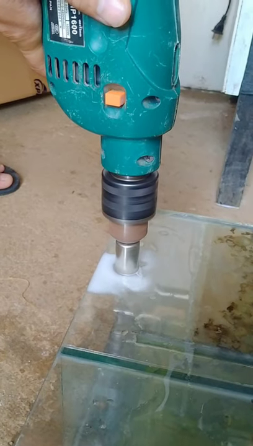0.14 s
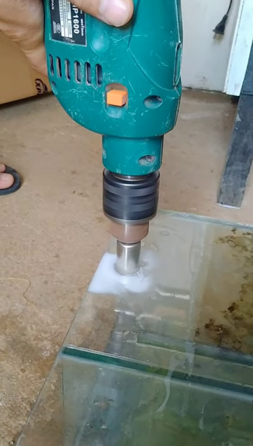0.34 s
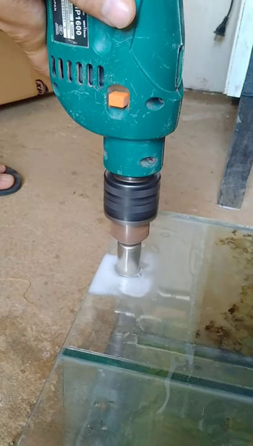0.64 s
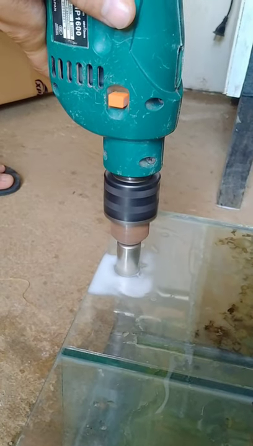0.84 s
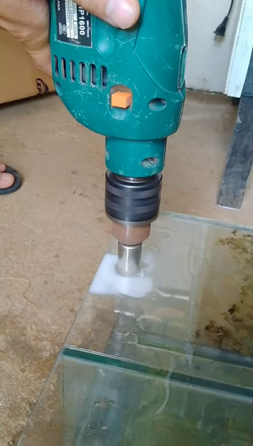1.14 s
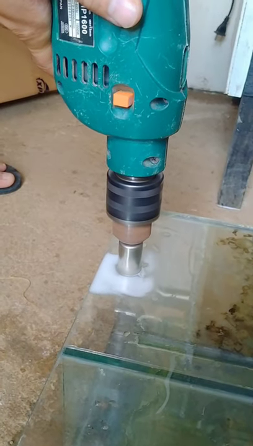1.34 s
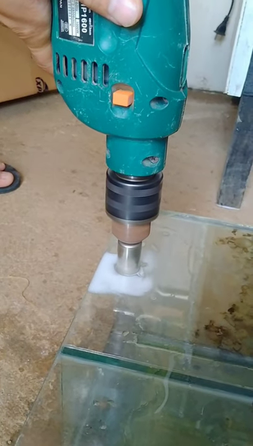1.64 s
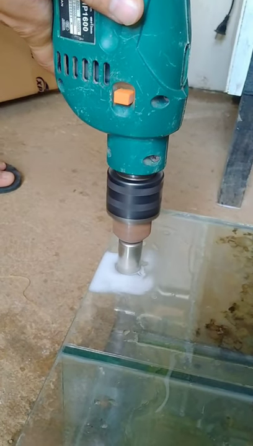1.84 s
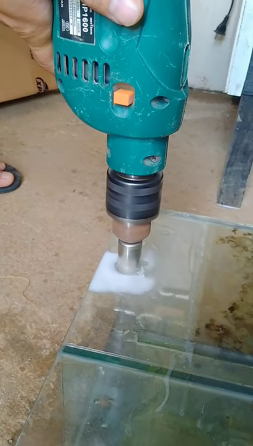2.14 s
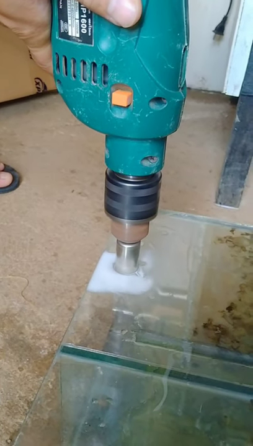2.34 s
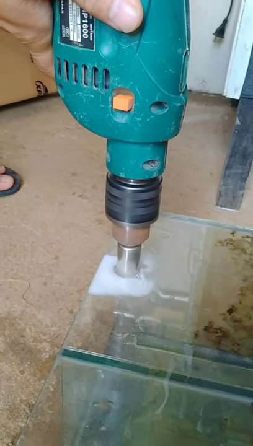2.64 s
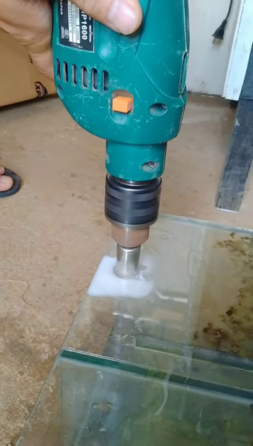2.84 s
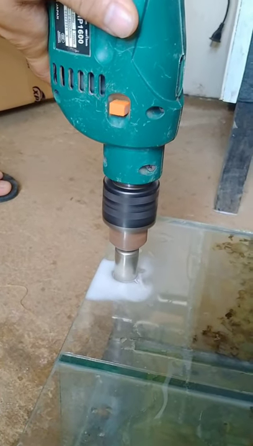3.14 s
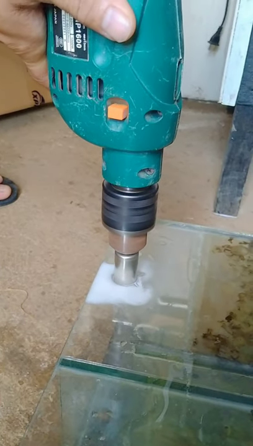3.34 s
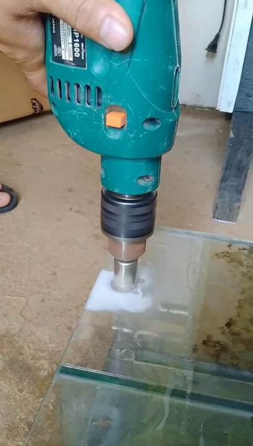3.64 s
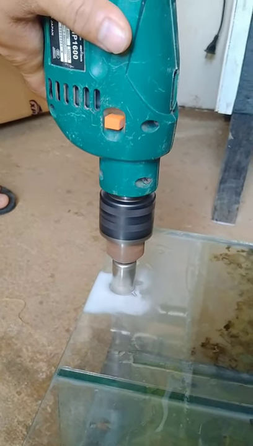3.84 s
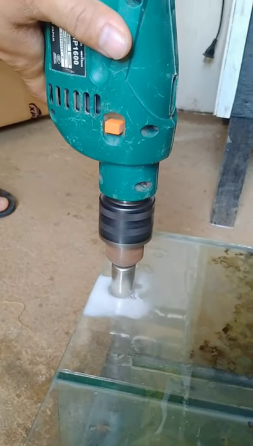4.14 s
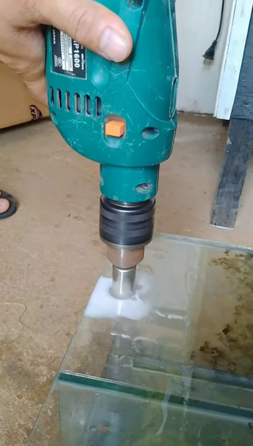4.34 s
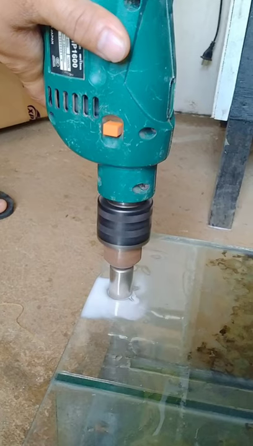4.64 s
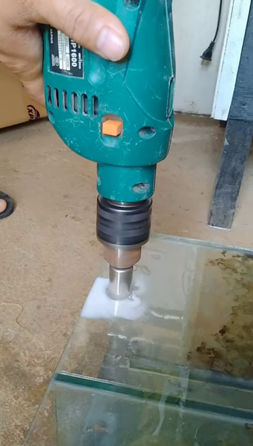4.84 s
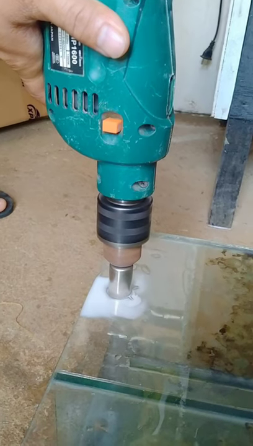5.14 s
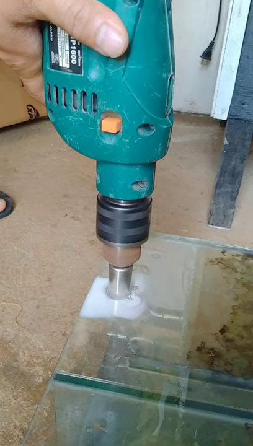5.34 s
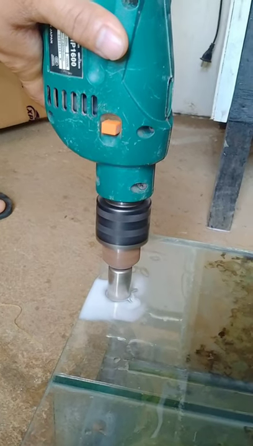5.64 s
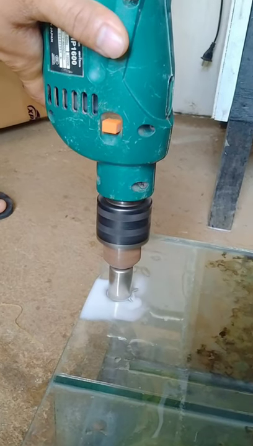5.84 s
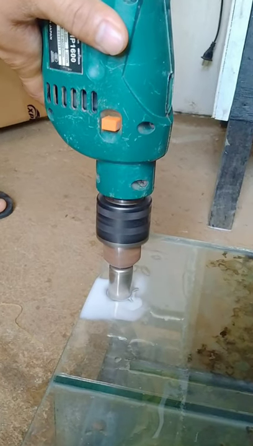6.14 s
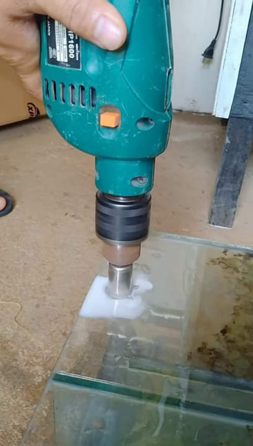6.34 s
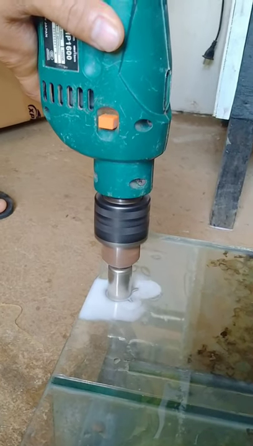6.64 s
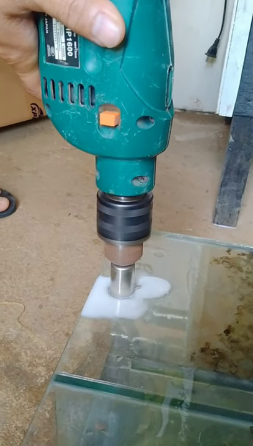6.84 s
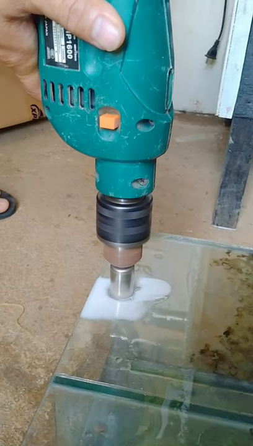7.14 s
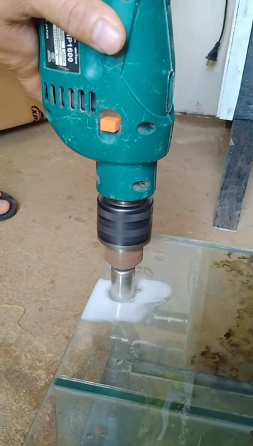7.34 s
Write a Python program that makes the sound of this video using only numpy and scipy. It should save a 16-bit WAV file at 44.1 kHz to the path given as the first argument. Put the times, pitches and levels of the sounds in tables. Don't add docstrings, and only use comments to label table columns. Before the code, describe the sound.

An electric drill grinds a core bit through a wet glass tank, very close to a phone microphone. The motor sags in the first half second, recovers, then holds steady. A rough, rapidly fluttering squeal dominates, first mixed, then mostly high and piercing, later dropping to a lower, hollower screech. Grit scrapes, the tank rumbles faintly and slurry fizzes; the sound is dense and squashed by limiting.

```python
import sys
import numpy as np
from scipy import signal
from scipy.fft import rfft, irfft, next_fast_len
from scipy.io import wavfile
from scipy.ndimage import uniform_filter1d, minimum_filter1d, map_coordinates

SR = 44100
rng = np.random.default_rng(int(sys.argv[2]) if len(sys.argv) > 2 else 0)


def nominal_scale(level):
    x = np.asarray(level, float) / 20
    return 10 ** x


def digitize_waveform(pressure):
    field = np.atleast_2d(pressure).T
    bounded = np.clip(field, -1, 1)
    quanta = np.round(bounded * 32767).astype(np.int16)
    wavfile.write(sys.argv[1], SR, quanta)


N = 330309
SLOW = np.arange(0, N + 128, 128)
SLOW_S = SLOW / SR

# time in seconds, speed in turns per second.
SPIN = [(0, 31.4), (.1, 30.8), (.2, 29.5), (.3, 29.05), (.4, 28.85), (.49, 29.1), (.62, 31.25),
        (.74, 32.45), (.86, 33.4), (1.04, 34.3), (1.28, 34.9), (1.6, 35.34), (2.1, 35.64), (2.76, 35.76),
        (3.9, 35.76), (5.45, 35.37), (6, 35.73), (7.49, 35.77)]


def unit_rms(x):
    return x / np.sqrt(np.mean(np.abs(x) ** 2, axis=-1, keepdims=True) + 1e-20)


def every_sample(curve):
    return np.interp(np.arange(N), SLOW, curve)


def slow_columns(table):
    seconds, *columns = np.transpose(table)
    return [np.interp(SLOW_S, seconds, column) for column in columns]


def during(start, end):
    return np.clip(np.minimum(SLOW_S - start, end - SLOW_S) / 0.068 + .5, 0, 1)


def bumps(rows, half_s=None):
    return sum(row[-1] * np.exp(-.5 * ((SLOW_S - row[0]) / (half_s or row[1])) ** 2) for row in rows)


def wobble(rate, count):
    knots = rng.standard_normal((count, 400))
    return np.array([map_coordinates(k, [SLOW_S * rate]) for k in knots])


def filtered(x, response):
    size = next_fast_len(N + 8192)
    return irfft(rfft(x, size) * response(np.fft.rfftfreq(size, 1 / SR)), size)[:N]


def coloured(x, points):
    f, db = np.transpose(points)
    return unit_rms(filtered(x, lambda hz: nominal_scale(np.interp(np.log(hz + 1), np.log(f + 1), db))))


def groove(turns, memory):
    steps = 2048
    fresh = rng.standard_normal((int(turns[-1]) + 22, steps))
    worn = signal.lfilter([1], [1, -memory], fresh, axis=0)[20:]
    return unit_rms(map_coordinates(worn.ravel(), [turns * steps]))


def chatter_db():
    # time in seconds, strength in dB, lean to the low zone in dB.
    contact = [(0, -7.5, 5), (.4, -9.5, 1), (.55, -12, -3), (.75, -10.5, 2.5), (.95, -11, -5.5),
               (1.5, -12, -5), (2.05, -11, -8.5), (2.8, -13, -5.5), (3.2, -12, -2), (3.7, -8, -8),
               (4.15, -12.5, 0), (4.5, -14, 12), (4.9, -11, 20), (5.7, -15.5, 22.5), (6.55, -14, 16),
               (6.85, -16.5, 1), (7.3, -18, 5.5), (7.49, -14.5, 0.5)]
    # time in seconds, change in dB.
    catches_low = [(.9, -1.5), (1.1, 2), (1.2, 0), (1.32, 4), (1.68, 3), (2.16, 0.5), (2.4, 4), (3.0, -0.5),
                   (5.5, 2), (5.9, 5), (6.1, 2.5), (6.3, -3), (6.6, 4.5)]
    catches_high = [(0, -5), (.1, 3.5), (.2, 1), (.56, 3), (.7, 0.5), (.8, 1.5), (.9, -2), (1.0, 1.5),
                    (1.25, -0.5), (1.74, -3), (2.16, 5.5), (2.4, -5.5), (2.52, 0.5), (2.76, 3.5),
                    (2.88, -5), (4.08, -6), (4.2, 3), (4.52, 7), (4.92, 4.5), (5.28, 9)]
    catch_s = 0.047
    strength_db, lean_db = slow_columns(contact)
    low_db = strength_db - 10 * np.log10(1 + nominal_scale(-2 * lean_db))
    high_db = low_db - lean_db
    return low_db + bumps(catches_low, catch_s), high_db + bumps(catches_high, catch_s)


def lean(lag_s):
    low_db, high_db = chatter_db()
    share = 1 / (1 + nominal_scale(2 * (high_db - low_db)))
    return np.clip(uniform_filter1d(share, size=round(lag_s * SR / 128)), 0, 1)


def working(level_db, lean_db, depth_db):
    return level_db + lean_db * lean(0.99) + depth_db * (SLOW / N - .5)


def squeal(turns, zone, multiples, flicker_db, skirt_db, drift, shiver):
    # centre in Hz, climb in Hz, steepness of the climb.
    climb = [
        (1006.7, 115.4, 1.2),
        (2015.4, 58, 2.07),
    ]
    # narrowest in Hz, widening in Hz.
    widen = [
        (25, 17),
        (12.2, 75),
    ]
    upper_reach = [1.2, 0.98]
    # time in seconds, low zone angle in turns and sweep in
    swell = [(0, 1.0, .7, .55, -.1), (.45, 1.05, .7, .33, -.1), (.75, 1.3, .6, .02, -1.6),
             (1.3, 1.53, .3, .1, -1.5), (1.65, 1.23, .3, -.03, -1.5), (2.5, 1.18, -.7, -.1, -2.4),
             (3.3, 1.14, -1.2, -.26, -.8), (4.0, 1.17, -1.5, -.2, -.4), (4.9, .95, -3.2, -.38, -.6),
             (5.5, .72, -1.2, -.48, -.6), (6.2, .55, -1.2, -.64, -.6), (6.8, .15, -2, -.89, .1),
             (7.05, -.11, -.6, -.93, .1), (7.49, -.11, -.6, -.98, .1)]
    # bumps (lobes) per turn, start in seconds, end in seconds, extra level in dB.
    lobes_low = [(34, -.1, .15, 3), (34, .15, .55, 9), (34, .55, .75, 4), (36, -.1, .15, 3),
                 (37, .3, .55, 6), (38, .1, .55, 8), (36, .15, .6, -8), (35, .15, .6, -6),
                 (40, .15, .45, 4), (42, .15, .45, 8), (43, .15, .45, 7), (37, .6, .9, 6),
                 (32, .95, 1.5, 4), (31, .95, 1.5, 3), (34, 1.2, 1.5, 5), (28, 1.45, 4.2, 6),
                 (28, 1.8, 2.25, 4), (29, 1.85, 2.25, -5), (30, 4.3, 7.6, 3), (31, 4.55, 5.25, 7),
                 (31, 5.5, 6.2, 6), (32, 4.45, 5.2, -7), (32, 5.2, 5.5, 6), (32, 6.2, 6.55, 5),
                 (31, 6.5, 6.75, 6), (33, 4.8, 6.5, 5), (34, 4.3, 5.8, 4), (28, 4.5, 5.7, 7),
                 (33, 7.0, 7.25, 6)]
    lobes_high = [(65, -.1, .15, 5), (66, .2, .6, 5), (69, .15, .45, 4), (72, .3, .55, 6), (63, .6, .9, 4),
                  (64, .75, .9, 6), (59, .9, 1.05, 5), (58, 1.0, 1.15, 5), (57, 1.15, 1.6, 4),
                  (56, 1.55, 2.3, 5), (56, 1.98, 2.28, 4), (55, 2.85, 3.5, 4), (56, 2.6, 2.85, 4),
                  (56, 3.45, 4.2, 4), (58, 2.3, 4.6, 3), (54, 2.35, 2.6, 9), (54, 2.95, 3.4, 10),
                  (57, 2.75, 3.6, -4), (57, 6.7, 7.6, 4), (58, 6.75, 7.0, 3), (56, 7.15, 7.4, 3),
                  (59, 4.3, 5.2, 4)]

    spin = slow_columns(SPIN)[0]
    low = lean(0.14)
    rest_hz, climb_hz, steepness = climb[zone]
    narrow_hz, widen_hz = widen[zone]
    centre_hz = rest_hz + climb_hz * low ** steepness
    width_hz = narrow_hz + widen_hz * (low if zone else 4 * low * (1 - low))

    k = np.array(multiples)[:, None]
    reach = np.where(k * spin > centre_hz, upper_reach[zone], 1)
    off = np.abs(k * spin - centre_hz) / width_hz / reach
    gain_db = flicker_db * wobble(7, count=len(k)) - skirt_db * (off + 0.0097 * off ** 2)
    for lobes, start, end, extra_db in lobes_low + lobes_high:
        gain_db += (k == lobes) * extra_db * during(start, end)
    gain = nominal_scale(gain_db)
    gain *= nominal_scale(chatter_db()[zone]) / np.sqrt(np.sum(gain ** 2, axis=0) / 2)

    angle, sweep = slow_columns(swell)[2 * zone:2 * zone + 2]
    middle = uniform_filter1d(centre_hz / spin, size=300)
    slope = angle * k - np.cumsum(middle * np.gradient(angle))
    phase = sweep / 2 * (k - middle) ** 2 - 2 * np.pi * slope
    phase += drift * wobble(2.5, count=len(k)) + shiver * wobble(28, count=len(k))
    out = np.zeros(N)
    for multiple, g, p in zip(multiples, gain, phase):
        out += every_sample(g) * np.cos(2 * np.pi * multiple * turns + every_sample(p))
    return out


def housing(turns):
    # centre in Hz,
    # width in Hz, level in dB, change with full lean in dB, change as the hole deepens in dB.
    pane_modes = [(2303, 72, -35, -2, 12.5), (2900, 16, -26, -17.5, 2), (3074, 70, -25.5, -17, -0.3),
                  (4040, 29, -54.5, 1, 15.5), (11660, 200, -76, 10.5, 2.5), (12050, 130, -71, -0.5, 11)]
    gearbox_modes = [(706.4, 65, -31, -1.5, 2.5), (1684, 70, -27.5, -11, 11), (2655, 110, -25, -6, -3.5),
                     (2772, 67, -22, -5, 6), (3486, 47, -26, -6.5, 0), (3626, 140, -35.5, 11, -2.5),
                     (5548, 190, -44.5, -5.5, 9)]
    housing_modes = [(354.3, 61, -37, -1, 6.5), (1248, 150, -36.5, 10.5, 0.5), (2243, 100, -32.5, 1, -9.5),
                     (3356, 45, -35.5, 6, -5.5), (5030, 130, -47, -4.5, 1)]
    # near which Hz, start in seconds, end in seconds, extra level in dB.
    freed = [
        (2672, 1.7, 2.8, 4),
        (1683, 1.8, 3, 2.5),
        (5564, 3.5, 5.9, 5),
        (2314, 5.8, 5.9, 4.5),
        (348, 6.6, 7.6, 0.5),
        (5570, 6.6, 7.6, 8),
        (2777, 6.6, 7.6, 3.5),
        (706, 6.9, 7.3, 6.5),
        (706, 5.4, 5.4, -4),
        (3500, 4, 3.7, -6),
    ]
    size = next_fast_len(N + 8192)
    f = np.fft.rfftfreq(size, 1 / SR)
    out = np.zeros(N)
    for third, modes in enumerate([pane_modes, gearbox_modes, housing_modes]):
        pattern = signal.hilbert(groove(turns, memory=0.62), size)[:N]
        shifted = pattern * np.exp(2j * np.pi * third / 3 * turns)
        spectrum = rfft(np.real(shifted), size)
        for (centre, width, *rule), sway in zip(modes, wobble(7.8, count=len(modes))):
            response = (1j * f * width / (centre ** 2 - f * f + 1j * f * width)) ** 2
            ring = unit_rms(irfft(spectrum * response, size)[:N])
            level_db = working(*rule) + 1.1 * sway
            for hz, start, end, extra_db in freed:
                nearness = np.exp(-((centre / hz - 1) / .015) ** 2)
                level_db = level_db + extra_db * during(start, end) * nearness
            out += every_sample(nominal_scale(level_db)) * ring
    return out


def grinding(turns):
    # frequency in Hz, strength in dB per Hz.
    grit_colour = [(150, -44.5), (250, -16), (331, -16), (559, -11.5), (713, -7.5), (846, -10.5),
                   (1070, -0.5), (1500, -10), (2060, -4.5), (2440, -9), (2720, -1.5), (3610, -10),
                   (4600, -38), (5980, -61.5), (10100, -120)]
    tank_colour = [(15, -59), (25, -36), (43, -37.5), (93, -7.5), (128, -1.5), (314, -2), (340, -10),
                   (400, -4.5), (520, -13.5), (880, -120)]
    fizz_colour = [(2290, -27.5), (3900, 2), (4460, -5), (5610, -10), (5950, -10.5), (7750, -21),
                   (8200, -34), (10700, -60.5), (18000, -120)]
    # level in dB, change with full lean in dB, change as the hole deepens in dB, share of a shove.
    levels = [
        (-17, -1, -2.5, 0.14),
        (-33.5, -0.5, -3.5, 0.95),
        (-34, 1.2, 4, 0.53),
    ]
    # time in seconds, half length in seconds, change in dB.
    shoves = [
        (.15, 0.29, 5.5),
        (2.1, 0.18, 4.5),
        (2.5, 0.068, 0.5),
        (2.8, 0.079, -4.5),
        (3.7, 0.62, 3.5),
        (4.3, 0.56, 3),
        (5.76, 0.024, -2),
        (6.57, 0.061, 2),
    ]
    push_db = bumps(shoves)
    grit_db, rumble_db, fizz_db = [every_sample(working(*rule) + share * push_db) for *rule, share in levels]
    rumble_db = rumble_db + 0.83 * every_sample(wobble(10, count=1)[0])
    runout = np.sin(2 * np.pi * turns)
    scrape = nominal_scale(grit_db + 1.0 * runout) * coloured(groove(turns, memory=0.2), grit_colour)
    rumble = nominal_scale(rumble_db) * coloured(rng.standard_normal(N), tank_colour)
    fizz = nominal_scale(fizz_db + 0.63 * runout) * coloured(rng.standard_normal(N), fizz_colour)
    return scrape + rumble + fizz


def gears(turns):
    # pitch in thirds of chuck speed, start in seconds, end in seconds, level in dB.
    whistles = [
        (107, 1.5, 3.6, -34),
        (107, 4.0, 7.6, -34),
        (246, 2.15, 3.8, -29),
        (29, 5.8, 7.6, -38),
        (348, 6.0, 7.6, -46),
        (192, 4.4, 6.65, -33),
    ]
    flicker = wobble(5, count=len(whistles))
    shiver = wobble(22, count=len(whistles))
    out = np.zeros(N)
    for (thirds, start, end, db), f, s in zip(whistles, flicker, shiver):
        level = nominal_scale(db + 2 + 2.5 * f) * during(start, end)
        out += every_sample(level) * np.cos(2 * np.pi * thirds / 3 * turns + every_sample(.45 * s))
    return out


def scene():
    turns = np.cumsum(np.interp(np.arange(N) / SR, *np.transpose(SPIN))) / SR
    low = squeal(turns, zone=0, multiples=range(25, 44), flicker_db=2.3, skirt_db=4.6, drift=.35, shiver=.18)
    high = squeal(turns, zone=1, multiples=range(52, 74), flicker_db=2.5, skirt_db=5, drift=.4, shiver=.4)
    return (low + high + housing(turns) + grinding(turns) + gears(turns))[None]


def low_pass(x):
    return signal.sosfilt(signal.butter(12, 16790, fs=SR, output="sos"), x)


def record(dry):
    # frequency in Hz, strength in dB per Hz.
    hiss_colour = [(4590, -24.5), (7800, 0), (8420, -9.5), (9140, -10), (11600, -5), (12700, -8.5),
                   (15100, -8), (15700, -7)]
    top_hz = 15720
    need = np.minimum(1, 0.84 / (np.abs(dry) + 1e-9))
    gain = uniform_filter1d(minimum_filter1d(need, size=260), size=200)
    hiss_db = -48.0 + .5 * np.linspace(-1, 1, N)
    hiss = nominal_scale(hiss_db) * coloured(rng.standard_normal(N), hiss_colour)
    kept = filtered((dry * gain)[0] + hiss, lambda hz: (hz < top_hz) / (1 + (25 / (hz + 1)) ** 2))
    return low_pass(kept[None])


dry = scene()
out = record(dry)
digitize_waveform(out)
```